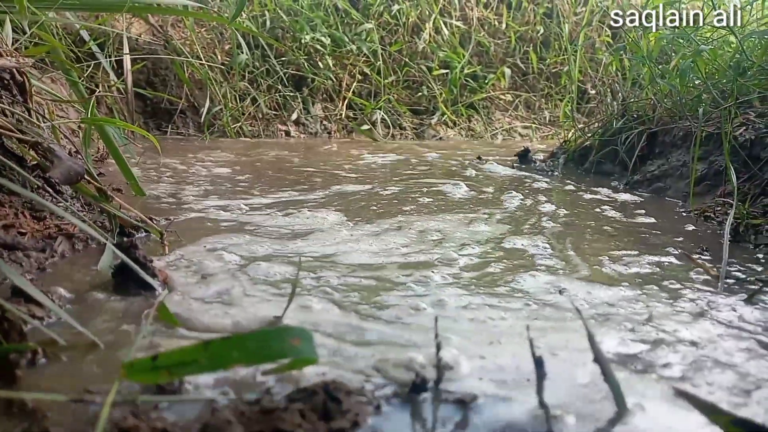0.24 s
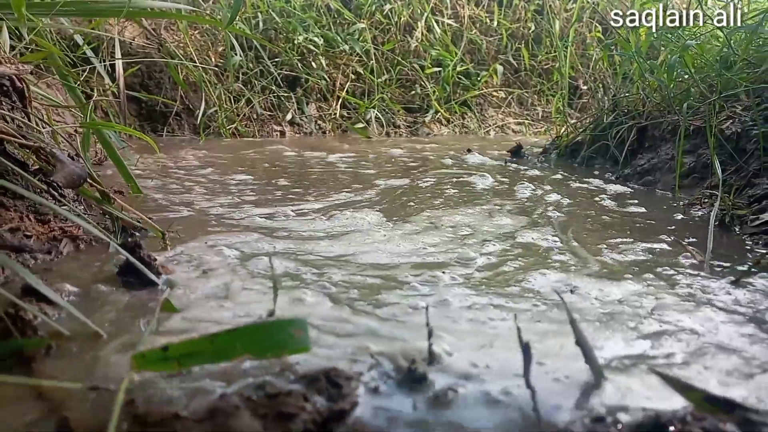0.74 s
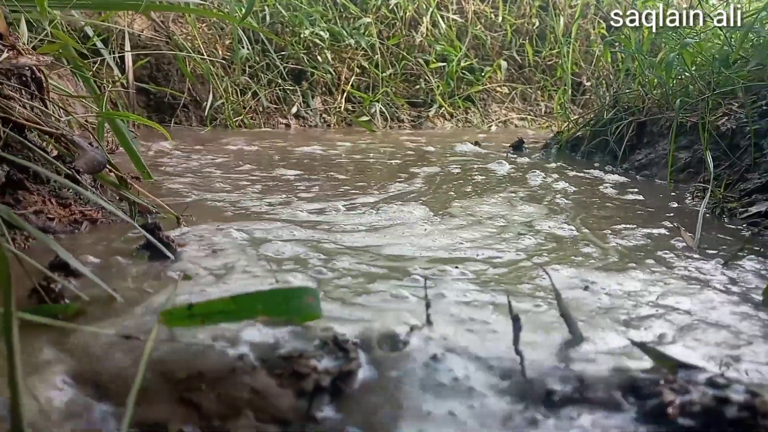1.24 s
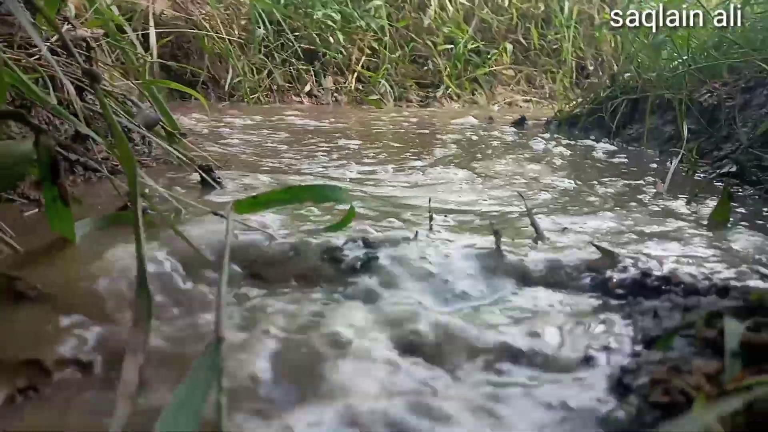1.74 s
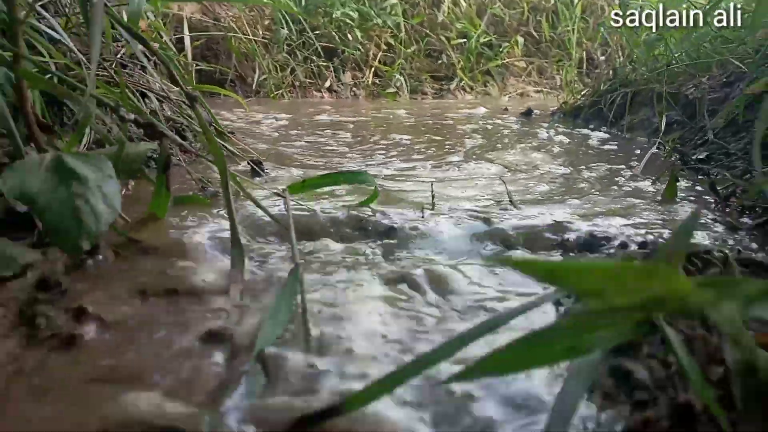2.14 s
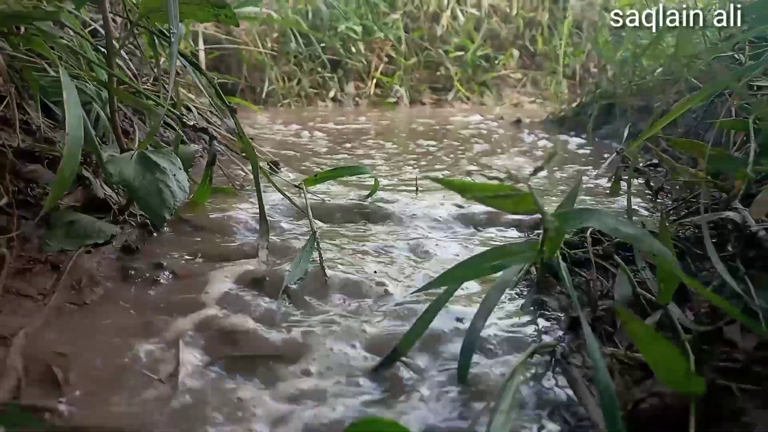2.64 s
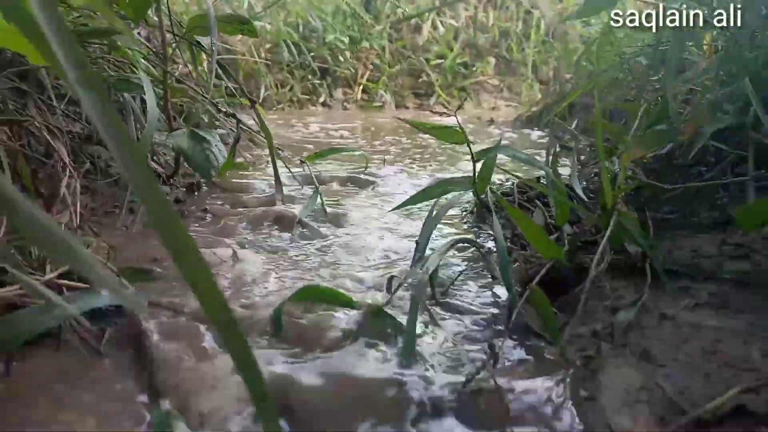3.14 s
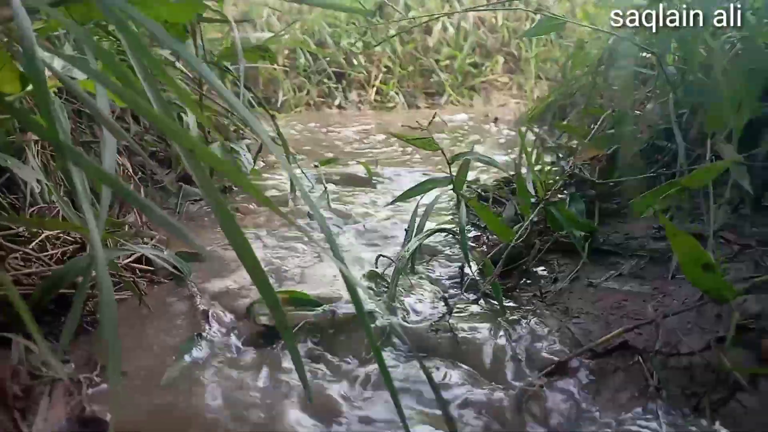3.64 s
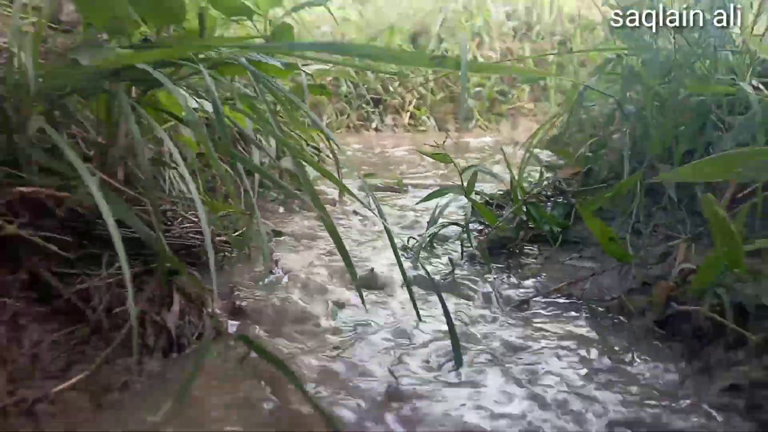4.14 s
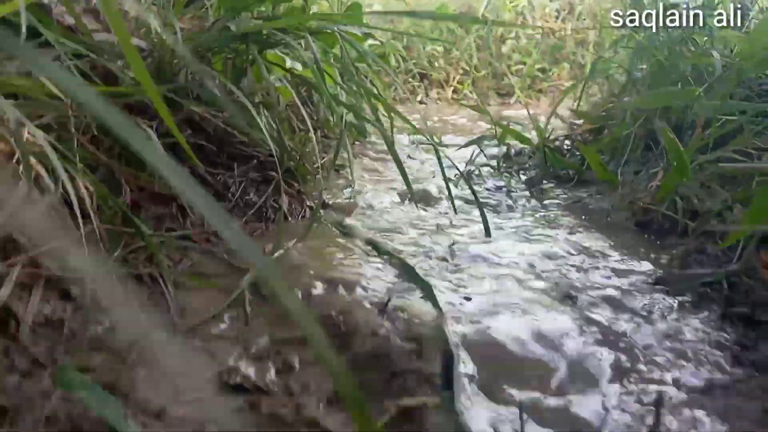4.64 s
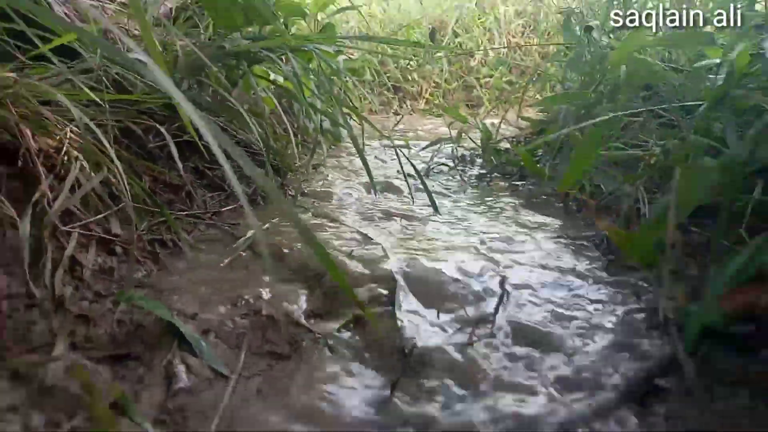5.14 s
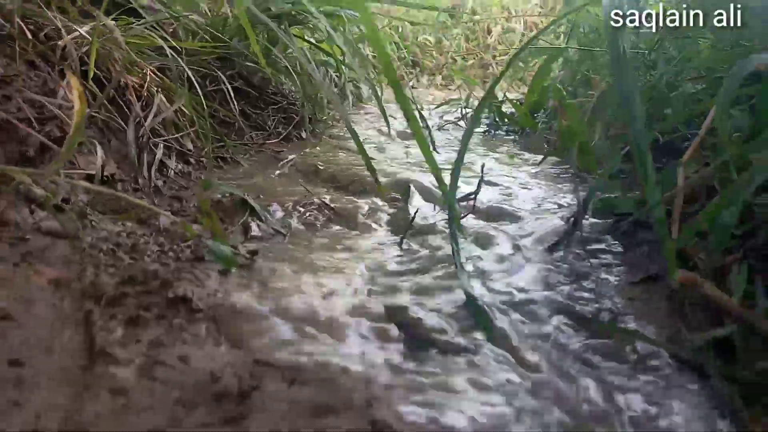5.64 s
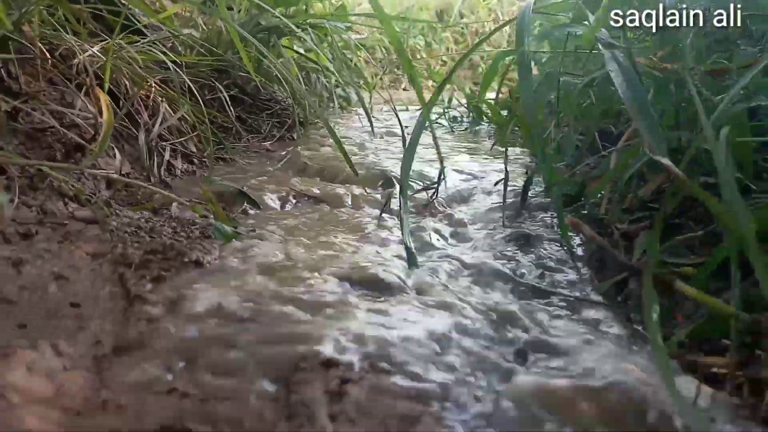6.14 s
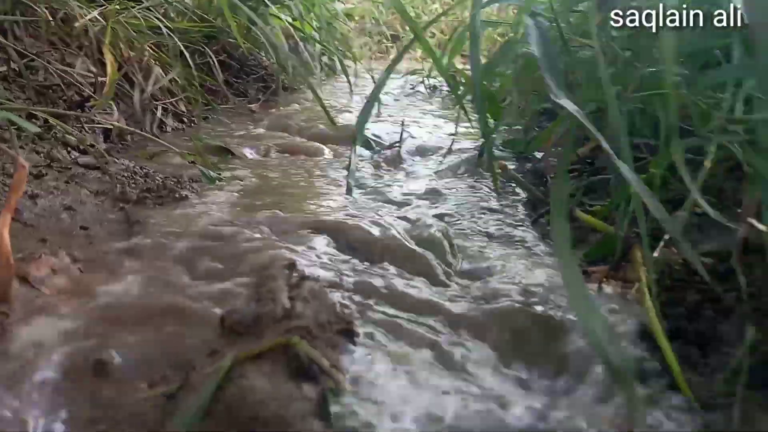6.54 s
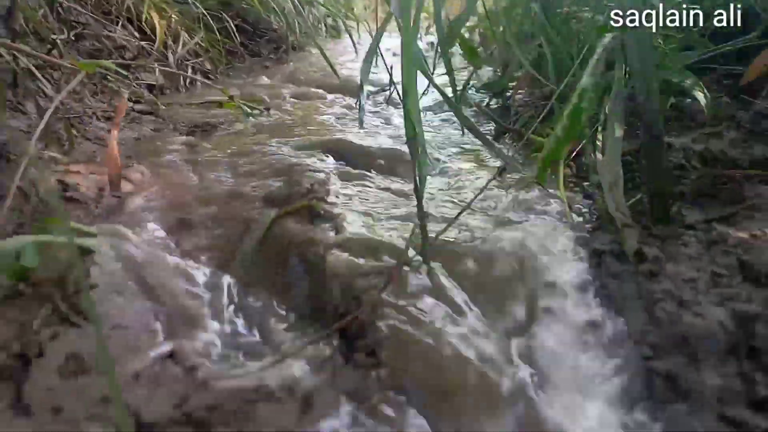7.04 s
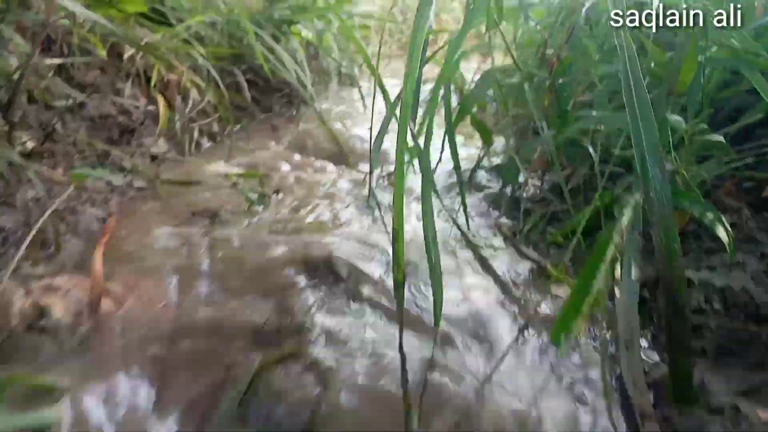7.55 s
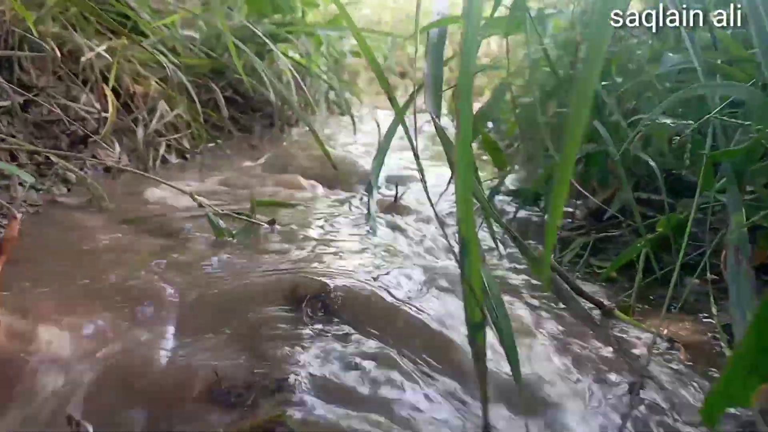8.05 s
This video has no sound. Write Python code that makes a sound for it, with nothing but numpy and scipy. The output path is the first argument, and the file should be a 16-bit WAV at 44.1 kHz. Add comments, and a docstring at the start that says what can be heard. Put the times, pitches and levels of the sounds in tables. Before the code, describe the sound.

A single-cylinder diesel pump engine thuds from start to finish, about 7.4 deep, rounded puffs a second, with short pipe-like ringing and a low drone, growing very slightly louder. Close muddy water, mostly on the left, gives a bright thin hiss pulsing with each beat. A sharp stalk tap opens the scene, another comes at 0.8, and hard knocks and scrapes strike the left microphone at 1.5-1.9. Churning, splashing surges gather from 1.5 to 2.5; a strong splash with gurgles and plops hits around 2.9-3.1, another at 4.3 with taps, then more at 5.1-5.4. Drops flick leaves between. Afterwards the water thins, with light gurgles near 7.2, 7.8 and 8.1. Knocks return at 7.4 and loudest at 7.6. A small distant bird gives quick high falling calls at 0.4-1.4, 2.0-2.5 and 5.5-6.7, then two peeps near 6.8. Open field, handheld low in grass.

```python
"""Field channel and pump engine

Muddy water hisses and churns along an earthen channel, close to a hand-held camera low in the grass: shaped
noise and rising bubble tones. A single-cylinder diesel pump engine thuds about 7.4 times a second through
filtered pressure puffs and ringing pipes, and the hiss throbs in time with it. A small bird, made of gliding
narrow noise, calls in three quick series and peeps twice; stalks tap the left microphone as scrapes and knocks."""
import sys
import numpy as np
from scipy import signal
from scipy.fft import rfft, irfft, next_fast_len
from scipy.io import wavfile
from scipy.ndimage import uniform_filter1d, minimum_filter1d, map_coordinates

SR = 44100
rng = np.random.default_rng(int(sys.argv[2]) if len(sys.argv) > 2 else 0)


def put_to_file(sound):
    """Save the sound as 16-bit audio at rate SR, in the file named by the first command-line argument."""
    columns = np.atleast_2d(sound).T  # one column per channel
    safe = np.clip(columns, -1, 1)
    whole_steps = np.round(safe * 32767)
    wavfile.write(sys.argv[1], SR, whole_steps.astype(np.int16))


N = 365588
TIME = np.arange(N) / SR

# spectral colour of the hiss that throbs with the engine: f/Hz, relative level/dB
HISS_COLOUR = [(500, -28), (900, -30.5), (1300, -20.5), (1650, -22), (2800, -16.5), (4000, -9),
               (5200, -5.5), (6500, 1), (7300, -4.5), (8200, -15), (9800, -15), (13800, -24), (14800, -18),
               (15600, -36.5)]
# spectral colour of the hiss that stays between beats: f/Hz, relative level/dB
TRICKLE_COLOUR = [(500, -28), (900, -51), (1300, -56), (1700, -26), (2800, -27), (4000, -16), (5200, -16),
                  (6300, 0.5), (7300, -6.5), (8200, -9), (9800, -7.5), (13800, -25), (14800, -5.5),
                  (15600, -8.5)]
# narrow bands that sing in the hiss: f/Hz, width/Hz, level/dB, wander/Hz, flicker/dB
SIZZLE_BANDS = [(1305, 66, -72.5, 50, 6), (5805, 300, -46.5, 49, 3), (8980, 510, -54, 70, 2.5),
                (9330, 420, -55, 78, 2)]
# spectral colours of churning and spraying water: f/Hz, relative level/dB
CHURN_COLOUR = [(150, -12), (400, -2.5), (800, -13.5), (1050, -10.5), (1300, 1.5), (2200, 4.5), (2900, 4.5),
                (3500, 4.5), (4500, -1.5), (7000, 2.5), (12000, -43)]
SPRAY_COLOUR = [(1500, -28), (3500, -12.5), (4800, -9.5), (5900, -1), (6700, 1), (8200, -11.5),
                (10500, -10), (13000, -15), (13900, -22), (14800, -3), (15600, -12)]
# steady churning, strongest where the camera passes the broken water: t/s, level before the churn boost/dB
ROUGH_WATER = [(0, -62.5), (.6, -65.5), (1.1, -55), (1.8, -50), (2.6, -53.5), (3.9, -53.5), (4.55, -62.5),
               (5.2, -48), (5.9, -68.5), (8.29, -71)]
# waves breaking over a clod: crest t/s, build-up/s, churn and spray levels before their boosts/dB
SURGES = [(.73, 0.07, -52, -62), (1.5, 0.19, -43, -49), (1.71, 0.19, -40.5, -45.5),
          (1.99, 0.27, -43, -46.5), (2.24, 0.038, -41, -46), (2.47, 0.17, -48.5, -47.5),
          (2.93, 0.097, -33.5, -37), (3.04, 0.068, -38.5, -46.5), (3.29, 0.24, -46, -46.5),
          (3.69, 0.15, -49, -51), (4.308, 0.2, -39, -39), (4.68, 0.035, -62, -52), (4.89, 0.12, -47, -49.5),
          (5.12, 0.14, -48, -42.5), (5.35, 0.28, -40, -39.5), (5.471, 0.062, -64, -48.5),
          (5.65, 0.14, -54, -56.5), (6.5, 0.16, -81, -50.5), (7.18, 0.18, -51.5, -59),
          (8.13, 0.077, -52.5, -75)]
# single drops flicking onto leaves: t/s, peak level before the drop boost/dB
DROPS = [(0.5292, -35), (1.6698, -19), (2.545, -23.5), (2.767, -22.5), (2.949, -24), (3.2012, -20.5),
         (3.3536, -23), (3.6206, -21.5), (4.7908, -36), (5.4858, -20), (5.5592, -23), (6.2667, -33)]
# left-right balance of the water, mostly to the left: f/Hz, L-R level/dB
WATER_LEAN = [(200, 0), (700, 3.5), (1400, 14), (2500, 13.5), (4000, 7.5), (6300, 15.5), (8000, 12),
              (10000, -2), (12500, 7.5), (15000, 8)]
# gurgles, short runs of bubbles: t/s, f/Hz, length/s, level before the gurgle trim/dB, L-R level/dB
GURGLES = [(1.45, 1490, 0.087, -36, 19), (2.934, 1390, 0.1, -32, -22), (3.059, 1260, 0.042, -34.5, -26),
           (4.332, 2220, 0.026, -29, 14), (5.077, 1210, 0.071, -41.5, 28), (7.18, 1330, .09, -44, 25),
           (7.366, 1430, .12, -49, 17), (7.818, 1600, 0.13, -54, 11), (8.139, 1560, 0.18, -46, 20)]
# larger bubbles that plop: t/s, f/Hz, level/dB, L-R level/dB
PLOPS = [(1.482, 1770, -28, 14), (2.877, 1100, -32, -12), (3.069, 1180, -24, -1), (3.096, 1150, -22, -19),
         (3.269, 1590, -31, 15), (3.354, 2230, -31, 23), (4.331, 1408, -26, 8), (4.531, 1110, -39.5, 21),
         (5.071, 1220, -30, 21)]
# engine speed, nearly steady: t/s, firings a second/Hz
ENGINE_SPEED = [(0, 7.4111), (1.7, 7.4333), (2.4, 7.3342), (4.7, 7.4361), (6.6, 7.435), (7.4, 7.3847),
                (8.29, 7.4701)]
# firings that come out weak: t/s, lost level/dB
WEAK_FIRINGS = [(1.662, 3), (4.237, 2.5), (4.775, 2.7)]
# puffs of one cycle (intake suction, exhaust, its inverted echo): t from the firing/s, signed size
STROKES = [(-.0303, -0.19), (0, 0.73), (0.0135, -0.17)]
# spectral shape of one puff through the silencer: f/Hz, relative level/dB
PUFF_COLOUR = [(25, -54), (55, -60), (80, -11), (115, -4), (185, -0.5), (235, -2.5), (310, -10), (350, -27),
               (385, -19.5), (545, -21.5), (640, -61), (1200, -108)]
# what rings after each puff in the pipe and casing: f/Hz, level/dB, t60/s
PIPE_MODES = [(142, -17.5, 0.086), (188, -22.5, 0.1), (233.7, -50, 0.067), (377.5, -27, 0.14),
              (446, -47, 0.17), (516.5, -36, 0.24)]
# spectral colour of the drone of the engine body: f/Hz, relative level/dB
DRONE_COLOUR = [(20, -42), (45, -20.5), (80, 2.5), (130, 0.5), (240, -6), (330, -12.5), (530, -23),
                (680, -41), (1500, -58)]
# left-right balance of the engine: f/Hz, L-R level/dB
ENGINE_LEAN = [(80, 4), (180, 4), (330, -1.8), (520, 3.5)]
# the bank shades the engine's upper notes less as the camera moves downstream: t/s, level/dB
BANK_SHADE = [(0, -3), (2.5, -1.5), (4.5, -1), (8.29, -0.5)]
# stalks tapping the left microphone: t/s, peak level/dB, scrape length/s, tilt/dB per octave
TAPS = [(0.018, -9, 0.0019, -4.5), (0.839, -10.5, 0.0041, 0), (1.551, 0, 0.00094, -3.5),
        (1.675, -5.5, 0.005, 6.5), (1.721, -7.5, 0.0093, 7.5), (1.858, -14.5, 0.0045, 2),
        (1.869, -15, .003, 2.5), (2.219, -24.5, 0.011, 0), (4.328, -17, 0.0046, 4),
        (4.345, -9, 0.0033, 5.5), (4.725, -8, 0.00094, 9.5), (4.78, -24, 0.0026, 13),
        (7.4228, -17.5, 0.0029, 0.5), (7.5884, 2, 0.0017, 2.5)]
# spectral colour of a stalk's knock: f/Hz, relative level/dB
STALK_COLOUR = [(80, -33), (300, -1.5), (700, 1.5), (1300, 0.5), (2400, -3.5), (3400, -8), (4400, -13.5),
                (6400, -5.5), (8500, -20), (13000, -60), (15000, -13)]
# the bird's series of calls: start t/s, number of calls, level before the call contour and direct trim/dB
CALL_SERIES = [(0.447, 4, -44.5), (2.05, 2, -41.5), (5.455, 5, -42)]
# one call (thin high note, level whistle, falling note): t from its start/s, f/Hz, relative level/dB
CALL_CONTOUR = [(0, 6700, -33), (.015, 6570, 5.5), (.035, 6376, 0), (.045, 6300, -40), (.05, 4042, -17),
                (0.064, 4080, -2), (0.081, 4020, -4.5), (.095, 3950, -6.5), (.098, 5750, 7),
                (.106, 5350, 3.5), (0.119, 4860, 2), (0.134, 4446, -4), (.145, 4300, -33)]
# short closing peeps: middle t/s, f/Hz, level before the direct trim/dB
PEEPS = [(6.77, 3696, -48), (6.87, 3820, -43)]

BED_SPRAY_DB = -0.5  # spray of the steady churning relative to its churn, before the boosts
COLLAPSE_S = 0.091  # a broken wave dies away over this time
BUBBLE_ATTACK_S = .0003
FIRST_FIRING_S = 0.0452
# firing level before stroke size and makeup gain, its slow growth, and its scatter from cycle to cycle
FIRING_DB, FIRING_GROWS_DB_PER_S, FIRING_SCATTER_DB = -18, 0.2151, 0.42
CALL_PERIOD_S, PEEP_S = 0.268, .016
CEILING_DB, RECOVERY_DB_PER_S = -4, 78  # the camera's limiter
TOP_HZ = 15650  # upper band limit


def stream():
    """The even hiss of the flow: noise swelling with each engine beat, with narrow sizzling bands."""
    swell = amp(-34 + 0.94 * wobble(2.8)) * throb(lead=0.00044, rise=0.02, fall=0.042)
    hiss = swell * unit(coloured(rush(patchy_db=3.0), HISS_COLOUR))
    hiss += amp(-47.5 + 1.0 * wobble(12)) * unit(coloured(rush(patchy_db=6.0), TRICKLE_COLOUR))
    for centre, width, db, wander, flicker_db in SIZZLE_BANDS:
        pitch = centre + wander * wobble(3)
        level = amp(db + flicker_db * wobble(11))
        hiss += level * np.array([narrow(pitch, width), narrow(pitch, width)])
    # faint babble from farther up the channel
    babble = coloured(bubbles(count=700, centre_hz=1715, cycles=45, spread_db=8.5), CHURN_COLOUR)
    return hiss + amp(-72.5) * unit(babble)


def surges():
    """Water breaking over clods: churning noise and bubbles below, fine spray above."""
    churn_gain, spray_gain = breaking()
    lumps = wobble(28)  # shared by churn and spray
    low_bubbles = bubbles(count=9000, centre_hz=1678, cycles=15.3, spread_db=1.5)
    churn = unit(coloured(rush(patchy_db=4.0) + 0.42 * low_bubbles, CHURN_COLOUR))
    fine_bubbles = bubbles(count=9000, centre_hz=7100, cycles=5, spread_db=3.0)
    spray = unit(coloured(rush(patchy_db=2.5) + .5 * fine_bubbles, SPRAY_COLOUR))
    churn *= churn_gain * amp(1.5 + 1.75 * lumps)
    spray *= spray_gain * amp(11.5 + 2.3 * lumps)
    return churn + spray


def breaking():
    """Gains of churn and spray: each wave builds up and collapses, on top of the steady churning."""
    bed = amp(np.interp(TIME, *np.transpose(ROUGH_WATER)))
    power = np.array([bed, bed * amp(BED_SPRAY_DB)]) ** 2
    for crest, build_s, churn_db, spray_db in SURGES:
        d = TIME - crest
        wave = np.exp(-np.where(d < 0, np.abs(d / build_s), (d / COLLAPSE_S) ** 2))
        power += np.outer(amp([churn_db, spray_db]), wave) ** 2
    return np.sqrt(power)


def drops():
    """Single drops flick onto the leaves as short decaying bursts of spray noise."""
    out, t = np.zeros((2, N)), TIME[:SR // 20]
    for s, db in DROPS:
        flick = coloured(rng.standard_normal((2, len(t))) * amp(-60 * t / 0.038), SPRAY_COLOUR)
        add(out, s, amp(db + 4.5) * flick / np.abs(flick).max())
    return out


def gurgles():
    """Trapped air breaks into dense runs of bubbles; single large ones plop."""
    out = np.zeros((2, N))
    for s, hz, length, db, lean_db in GURGLES:
        for when, pitch, size in rng.standard_normal((40, 3)):
            bubble = amp(db - 7.0 + 2 * size) * plop(hz * np.exp(.15 * pitch), t60=0.016)
            add(out, s + when * length / np.pi, panned(bubble, lean_db))
    for s, hz, db, lean_db in PLOPS:
        add(out, s, panned(amp(db) * plop(hz, t60=0.012), lean_db))
    return out


def plop(hz, t60):
    """One bubble rings, its pitch rising as it nears the surface."""
    t = TIME[:SR // 20]
    ring = np.sin(2 * np.pi * hz * t * (1 + 2 * t))
    return ring * amp(-60 * t / t60) * (1 - np.exp(-t / BUBBLE_ATTACK_S))


def bubbles(count, centre_hz, cycles, spread_db):
    """A stereo swarm of small ringing bubbles, each rising in pitch as it fades; rms 1."""
    when, pan, size = rng.random((count, 3)).T
    hz = np.clip(centre_hz * np.exp(0.527 * rng.standard_normal((count, 1))), 400, 14000)
    n = np.arange(256)
    age = n / SR * hz / cycles
    ring = np.sin(2 * np.pi * cycles * age * (1 + 0.037 * np.minimum(age, 2)))
    ring *= np.exp(-3 * age) * (1 - n / len(n))
    ring *= amp(-spread_db * np.log(np.maximum(size, .01)))[:, None]
    at = ((when * N).astype(int)[:, None] + n).ravel()
    sides = np.cos(pan * np.pi / 2), np.sin(pan * np.pi / 2)
    return unit(np.array([np.bincount(at, (ring * g[:, None]).ravel(), N)[:N] for g in sides]))


def rush(patchy_db):
    """Two unrelated white noises with shared drifting patches of gain in time and frequency."""
    z = signal.stft(rng.standard_normal((2, N)), nperseg=512)[2]
    field = uniform_filter1d(rng.standard_normal(z.shape[1:]), size=4, axis=0)
    field = uniform_filter1d(field, size=10, axis=1)
    return unit(signal.istft(z * amp(patchy_db * unit(field)), nperseg=512)[1][:, :N])


def engine():
    """Intake and exhaust puffs thud through the silencer; pipe and body ring after each blow."""
    kicks = np.zeros(N)
    for s, db in firings():
        for delay, size in STROKES:
            loose = bool(round(delay, 2))  # the weaker puffs vary from cycle to cycle
            at = s + delay + loose * rng.normal(0, 0.00046)
            add(kicks, at, np.array([size * amp(db + loose * rng.normal(0, 2.86))]))
    puff_peak = coloured(signal.unit_impulse(SR, 'mid'), PUFF_COLOUR).max()
    thuds = coloured(kicks, PUFF_COLOUR) / puff_peak
    t = TIME[:SR // 6]
    pipe = sum(np.cos(2 * np.pi * hz * t) * amp(db - 60 * t / t60) for hz, db, t60 in PIPE_MODES)
    pipe *= 1 - np.exp(-(t / 0.0022) ** 2)  # soft onset
    thuds = amp(2.5) * thuds + signal.fftconvolve(kicks, pipe)[:N]
    drone = unit(coloured(rng.standard_normal(N), DRONE_COLOUR))
    drone *= amp(-54.5) + amp(-41.0) * throb(lead=0.0038, rise=0.031, fall=0.034)

    lag = 0.00058  # seconds by which the sound reaches the right microphone first

    def ports(hz):
        delays = np.exp(np.outer([-1, 1], 1j * np.pi * hz * lag))
        return delays * amp(np.outer([.5, -.5], along(ENGINE_LEAN, hz)))

    # diffuse return from the fields
    field = amp(-53.5) * unit(coloured(rng.standard_normal((2, N)), DRONE_COLOUR))
    return filtered(thuds + drone, ports) + field


def firing_times():
    """The cylinder fires each time the engine completes a cycle."""
    cycles = np.cumsum(np.interp(TIME, *np.transpose(ENGINE_SPEED))) / SR
    cycles -= np.interp(FIRST_FIRING_S, TIME, cycles)
    return np.interp(np.arange(int(cycles[-1]) + 1), cycles, TIME)


def firings():
    """Time and level of every firing: slow growth, random scatter and a few weak ones."""
    s = firing_times()
    db = FIRING_DB + FIRING_GROWS_DB_PER_S * s + FIRING_SCATTER_DB * rng.standard_normal(len(s))
    for when, lost_db in WEAK_FIRINGS:
        db[np.argmin(np.abs(s - when))] -= lost_db
    return zip(s, db)


def throb(lead, rise, fall):
    """A swell that peaks lead seconds before each firing and dies away after it."""
    beats = firing_times() - lead
    k = np.clip(np.searchsorted(beats, TIME), 1, len(beats) - 1)

    def swell(d):
        return np.where(d < 0, np.exp(-(d / rise) ** 2), np.exp(-np.abs(d) / fall))

    return swell(TIME - beats[k - 1]) + swell(TIME - beats[k])


def shaded(x):
    """The bank shades only the part above the deep thud."""
    upper = filtered(x, lambda hz: 1 - 1 / (1 + (hz / 270) ** 6))
    return x + upper * (amp(np.interp(TIME, *np.transpose(BANK_SHADE))) - 1)


def taps():
    """A stalk scrapes and knocks on the left microphone: noise plus a sharp blow, each with its own tilt."""
    out, t = np.zeros(N), TIME[:SR // 20] - .01
    for s, db, length, tilt in TAPS:
        slide = .07 * (t > 0) * np.exp(-np.abs(t) / .009)
        scrape = rng.standard_normal(len(t)) * (np.exp(-np.abs(t) / length * 2) + slide)
        blow = -t / .00008 * np.exp(-(t / .00008) ** 2)
        colour = [(hz, level + tilt * np.log2(hz / 1000)) for hz, level in STALK_COLOUR]
        knock = coloured(scrape + 0.0053 / length * blow, colour)
        add(out, s - .01, amp(db) * knock / np.abs(knock).max())
    return out * amp([[0], [-27]])  # faint on the right


def bird():
    """A small bird repeats its call at an even pace some way off, smeared by the surrounding plants."""
    song = np.zeros(N)
    s, hz, db = np.transpose(CALL_CONTOUR)
    t = TIME[:SR // 7]
    for first, count, level in CALL_SERIES:
        for k in range(round(count)):
            pitch = np.interp(t, s, hz) * rng.normal(1, 0.00778)
            call = amp(level + np.interp(t, s, db)) * narrow(pitch, width_hz=330) / np.sqrt(2)
            add(song, first + k * CALL_PERIOD_S, call)
    u = t - t.mean()
    for middle, pitch, level in PEEPS:
        peep = np.exp(-(u / PEEP_S) ** 2) * narrow(np.full(len(t), pitch), width_hz=250)
        add(song, middle - t.mean(), amp(level) * peep / np.sqrt(2))
    tail = rng.standard_normal((2, SR // 4)) * amp(-60 * TIME[:SR // 4] / 0.15)
    scatter = signal.fftconvolve(song[None], tail / np.linalg.norm(tail[0]), axes=1)[:, :N]
    return panned(amp(-5.5) * song + amp(1.5) * scatter, lean_db=12)


def narrow(centre_hz, width_hz):
    """Noise in one resonance whose centre may move; rms 1."""
    slow = filtered(rng.standard_normal((2, len(centre_hz))), lambda hz: 1 / (1 + (2 * hz / width_hz) ** 2))
    phase = 2 * np.pi * np.cumsum(centre_hz) / SR
    return unit(slow[0] * np.cos(phase) + slow[1] * np.sin(phase))


def panned(sound, lean_db):
    """Place a sound lean_db louder on the left."""
    return sound * amp(np.array([[.5], [-.5]]) * lean_db)


def amp(db):
    """Decibels to gain."""
    return 10 ** (np.asarray(db) / 20)


def unit(x):
    """Scale to rms 1."""
    return x / np.sqrt(np.mean(x ** 2) + 1e-20)


def along(points, hz):
    """Read (f/Hz, value) points on a log frequency axis."""
    f, v = np.transpose(points)
    return np.interp(np.log(hz + 1), np.log(f + 1), v)


def wobble(rate):
    """A smooth random curve with rate knots a second."""
    return map_coordinates(rng.standard_normal(int(N * rate / SR) + 4), [TIME * rate])


def filtered(x, response):
    """Pass x through a response of frequency."""
    m = next_fast_len(x.shape[-1] + 8192)
    return irfft(rfft(x, m) * response(np.fft.rfftfreq(m, 1 / SR)), m)[..., :x.shape[-1]]


def coloured(x, spectrum):
    """Give x a (f/Hz, level/dB) colour."""
    return filtered(x, lambda hz: amp(along(spectrum, hz)))


def add(track, s, sound):
    """Mix a short sound into a track at time s."""
    start = max(round(s * SR), 0)
    part = track[..., start:start + sound.shape[-1]]
    part += sound[..., :part.shape[-1]]


def limited(x):
    """A peak over the ceiling turns both channels down together; the gain then creeps back."""
    over_db = np.maximum(20 * np.log10(np.abs(x).max(axis=0) + 1e-9) - CEILING_DB, 0)
    recovered = RECOVERY_DB_PER_S * TIME
    gain_db = recovered - np.maximum.accumulate(over_db + recovered)
    return x * amp(uniform_filter1d(minimum_filter1d(gain_db, size=65), size=65))


def scene():
    """The water leans mostly to the left; engine, gurgles, taps and bird join it."""
    water = stream() + surges() + drops()
    # a little of the water sound is shared, reaching the left side later
    water[0] += 0.13 * filtered(water[1], lambda hz: np.exp(-2j * np.pi * hz * 0.00095))

    def lean(hz):
        ratio = amp(np.outer([.5, -.5], along(WATER_LEAN, hz)))
        return ratio / np.sqrt(np.mean(ratio ** 2, axis=0))  # keeps the mean power gain at 1

    water = filtered(water, lean)
    return shaded(engine()) + water + gurgles() + taps() + bird()


def record(dry):
    """The camera limits peaks over its ceiling and keeps nothing above its band limit."""
    return filtered(limited(dry), lambda hz: hz < TOP_HZ)


dry = scene()
out = record(dry)
put_to_file(out)
```